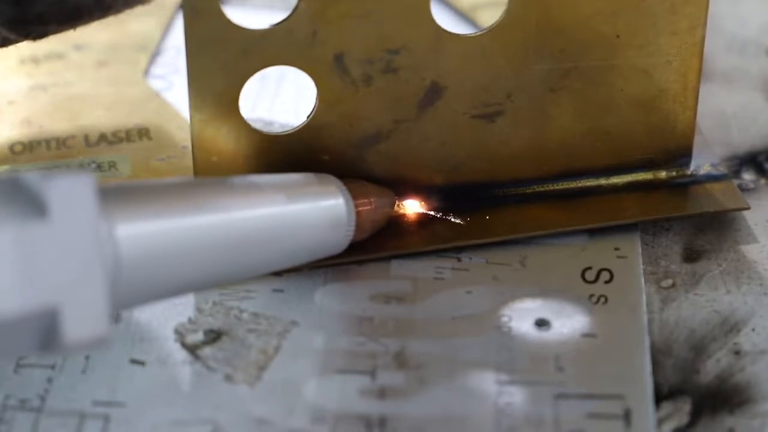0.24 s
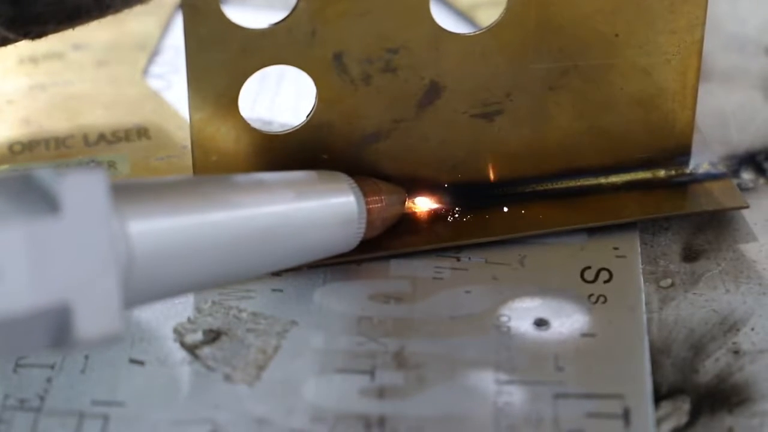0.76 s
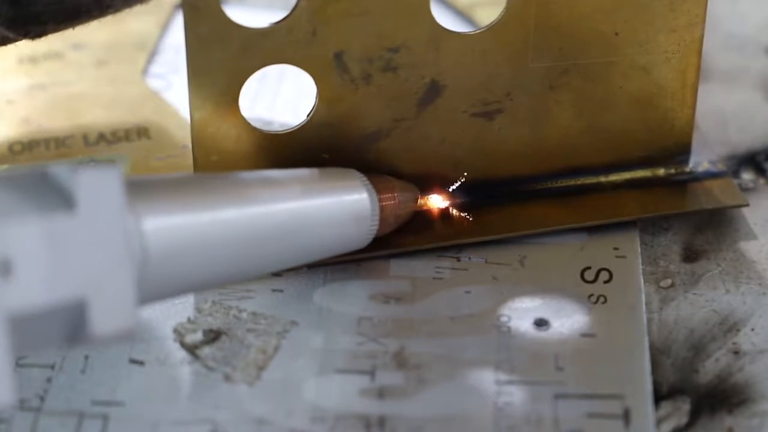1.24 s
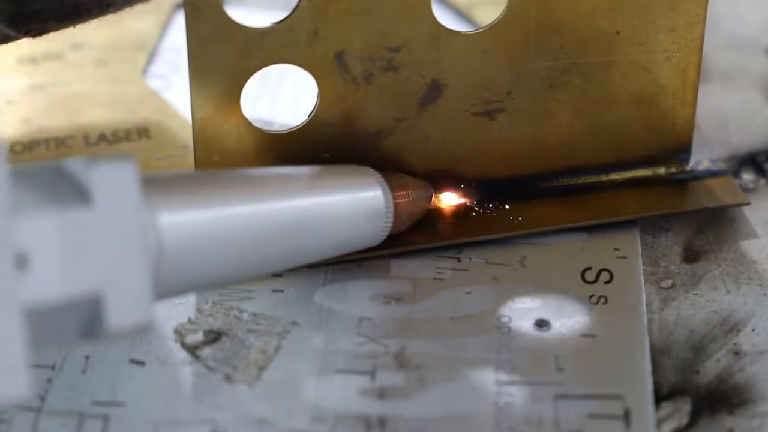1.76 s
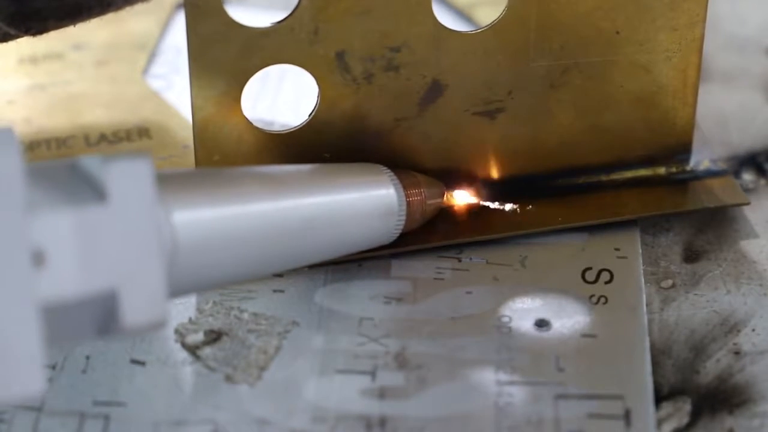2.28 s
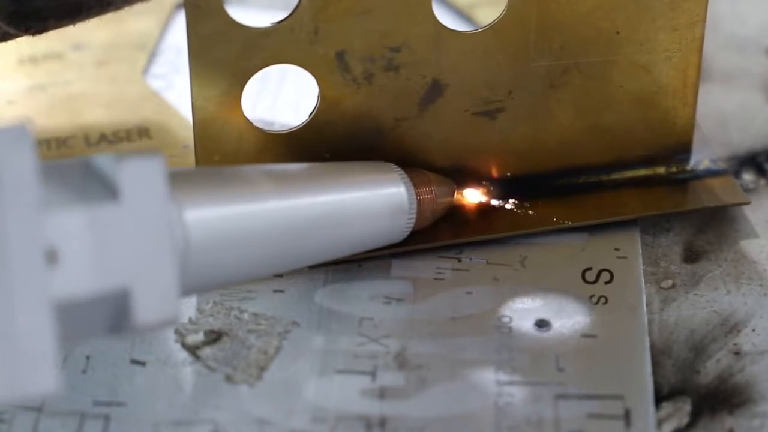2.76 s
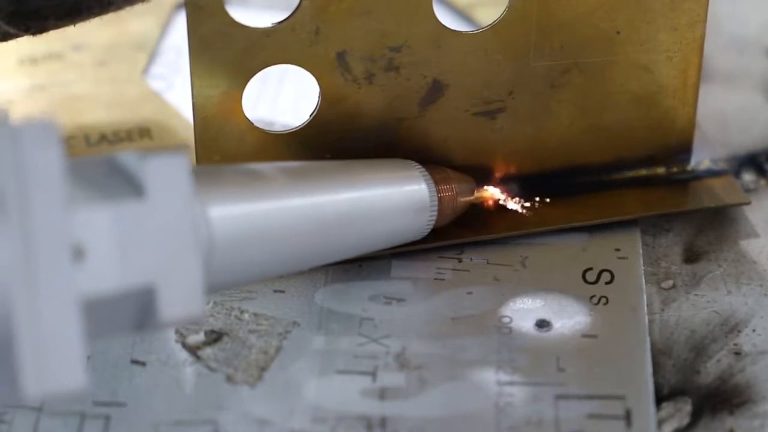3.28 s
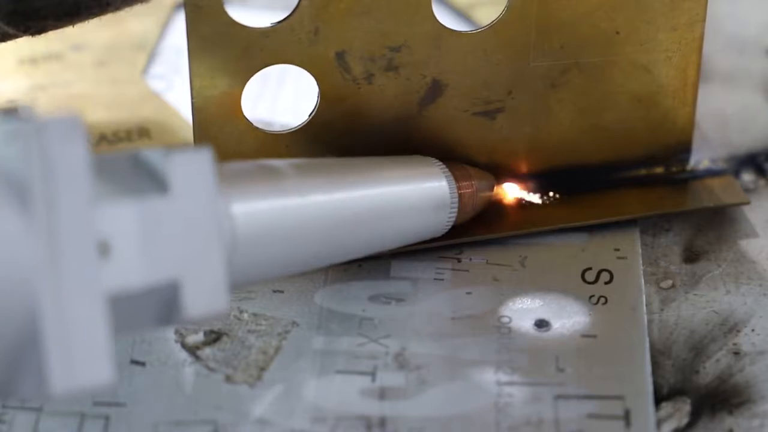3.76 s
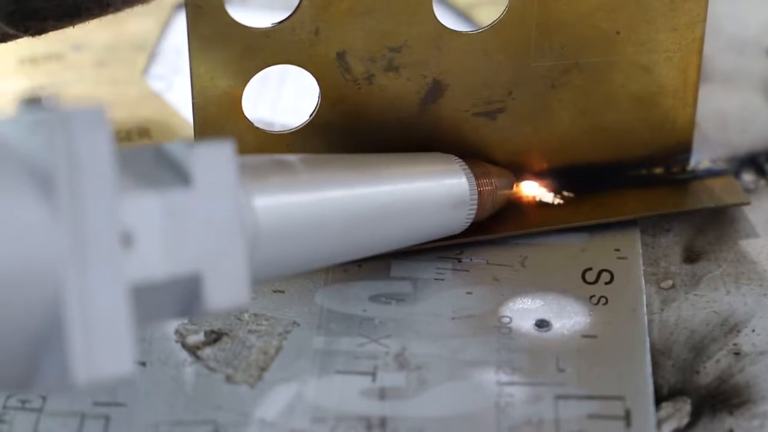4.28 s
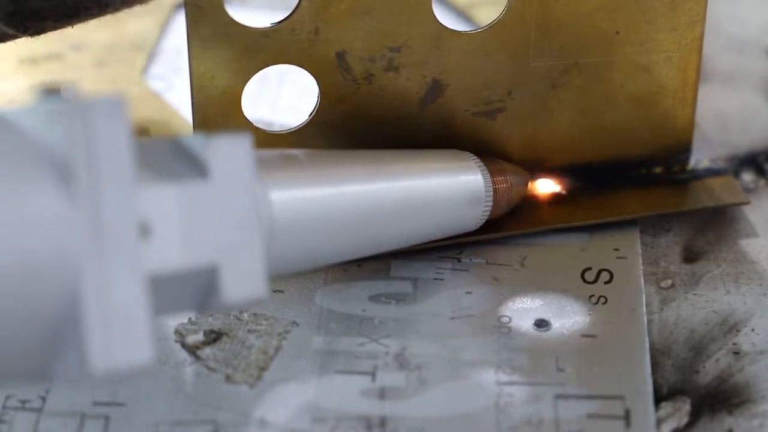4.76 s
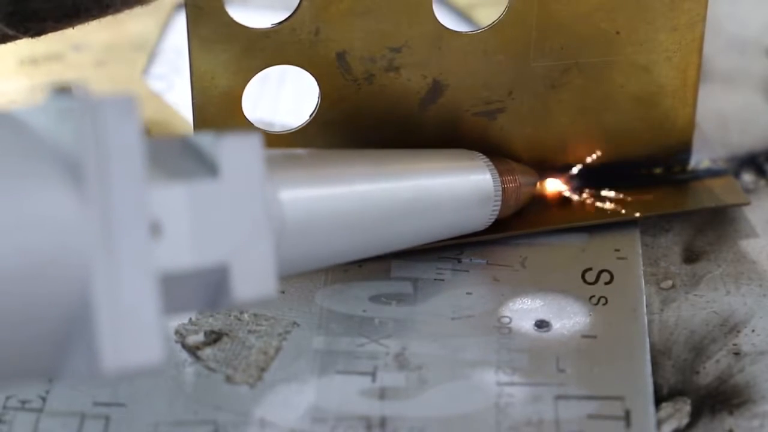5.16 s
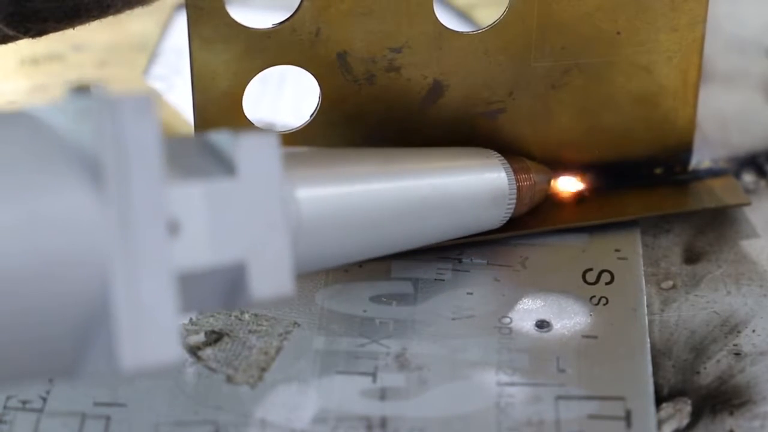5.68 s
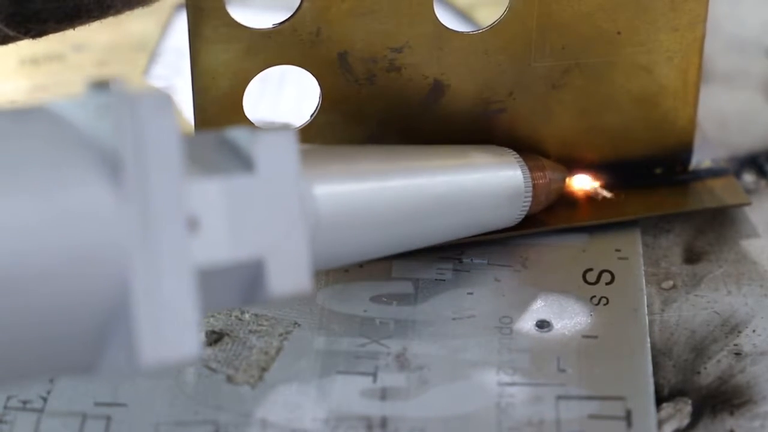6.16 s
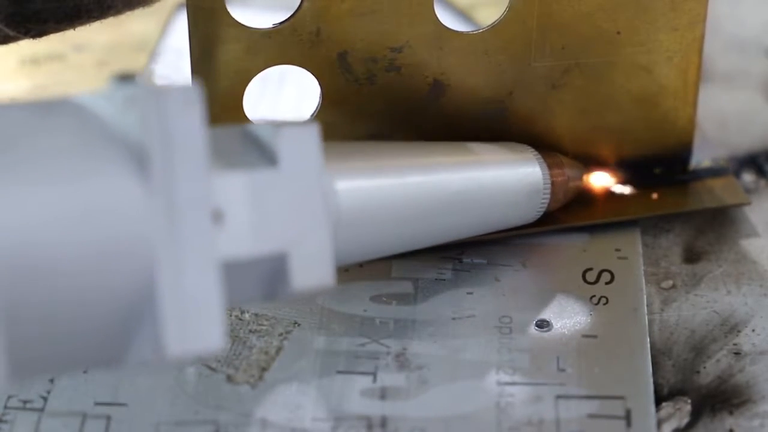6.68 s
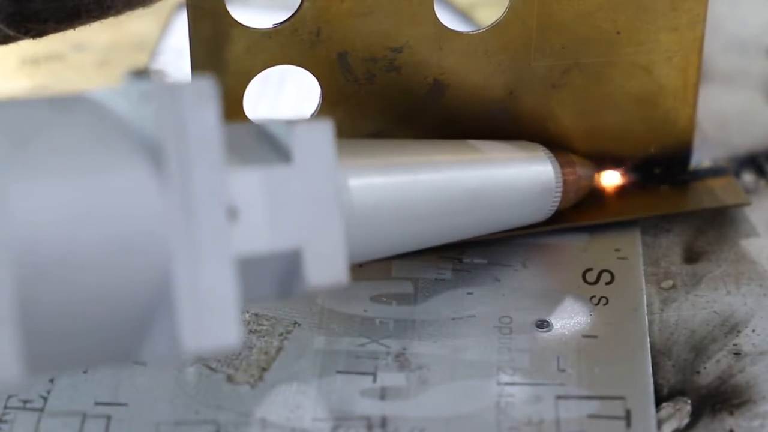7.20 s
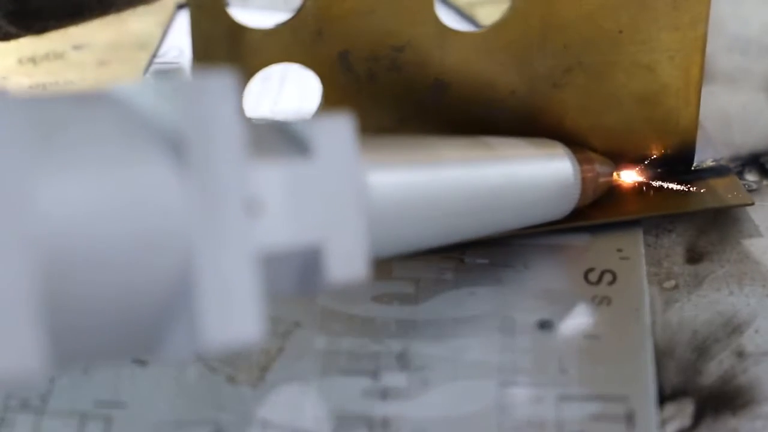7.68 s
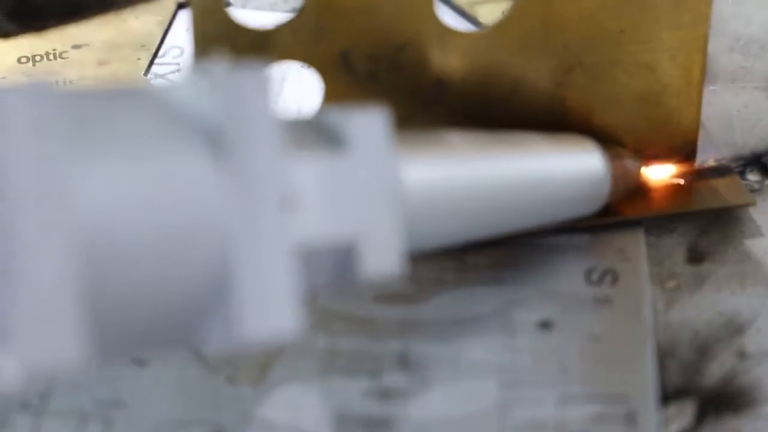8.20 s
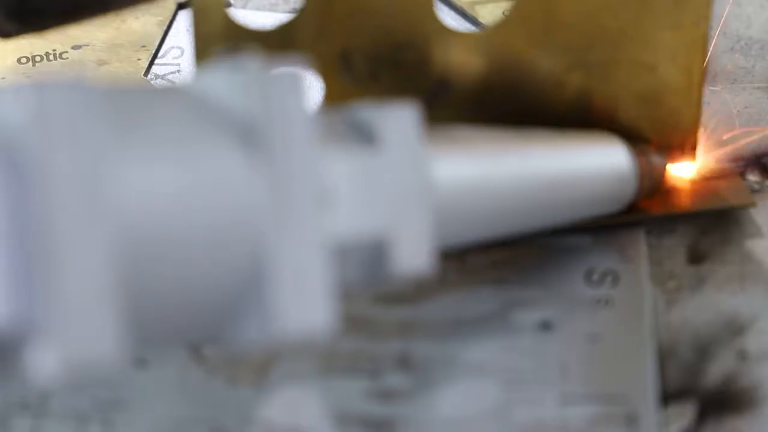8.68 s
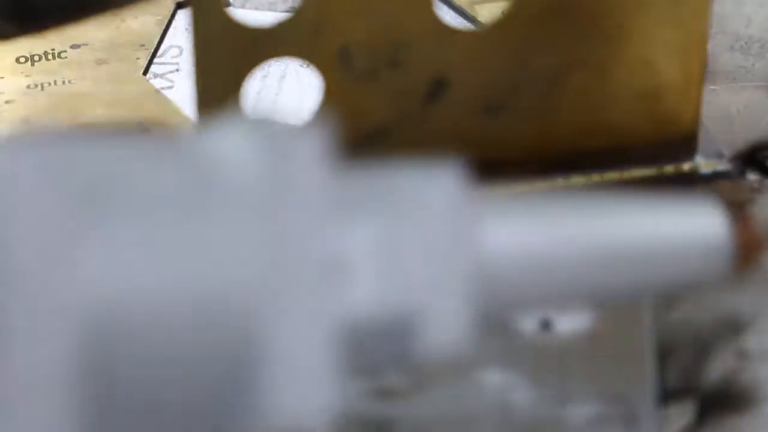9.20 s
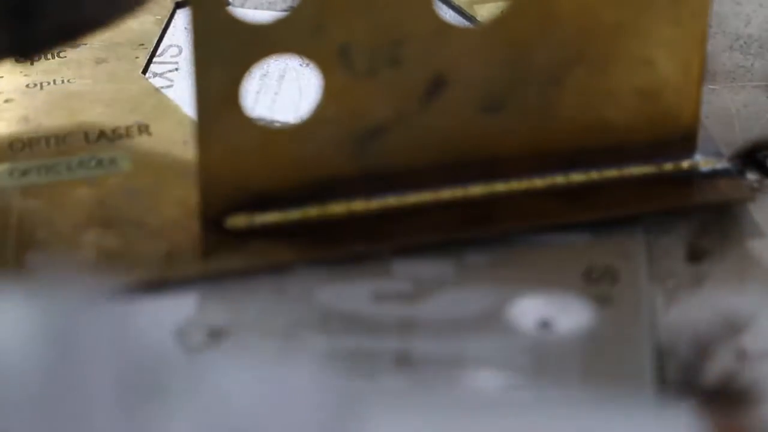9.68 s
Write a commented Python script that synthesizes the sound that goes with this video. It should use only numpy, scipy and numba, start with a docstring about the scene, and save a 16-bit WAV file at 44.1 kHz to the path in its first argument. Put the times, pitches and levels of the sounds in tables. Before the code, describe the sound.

High whistling gas and spitting, sizzling metal from a close laser welding gun end in rapid snaps, leaving workshop fans humming.

```python
"""In a workshop humming with fans, a handheld laser welder runs left to right along a corner seam, close
to a phone. Shielding gas whistles in the nozzle tube while the melt pool sizzles in step with the
sweeping beam. The pool flares at the edge of the sheet, then the beam stutters off in a run of snaps.
Gas blows a moment longer as the gun swings aside. Last, the phone draws back, air stirs past it
and its gain control lifts the hum."""
import sys
import numpy as np
from scipy import signal
from scipy.fft import rfft, irfft, next_fast_len
from scipy.io import wavfile
from scipy.ndimage import uniform_filter1d, minimum_filter1d
from numba import njit

SR = 44100
rng = np.random.default_rng(int(sys.argv[2]) if len(sys.argv) > 2 else 0)


def dump_mix(stems):
    """Bounce the given channels to the path in sys.argv[1] as a 16-bit WAV at rate SR."""
    frames = np.atleast_2d(stems).T  # one column per channel
    limited = np.clip(frames, -1, 1)  # hard clip at full scale
    pcm = np.round(limited * 32767).astype(np.int16)
    wavfile.write(sys.argv[1], SR, pcm)


N = 438333
FFT_SIZE = next_fast_len(N, True)
TIME, BIN_HZ = np.arange(N) / SR, np.fft.rfftfreq(FFT_SIZE, 1 / SR)
SEAM_S, BEAM_OFF_S = 9.8, 9.25  # time to cross a full seam length; the beam cuts out

# how alike the phone's two mic ports hear the room: (frequency [Hz], likeness [0-1])
ROOM_LIKENESS = [(60, 1), (300, 0.96), (700, 0.77), (1400, 0.35), (5000, 0)]
# how alike they hear the gun: (frequency [Hz], likeness [0-1])
GUN_LIKENESS = [(800, 0.73), (2500, 0.94), (7500, 0.95), (9000, 0.54), (11000, 1), (14000, 0.24)]


def undb(db):
    """Decibels to gain."""
    return np.exp(np.asarray(db) * (np.log(10) / 20))


def unit(x):
    """Scale to rms 1."""
    return x / np.sqrt(np.mean(x ** 2))


def curves(table):
    """One automation curve for each value column of a timed table."""
    times, *columns = np.transpose(table)
    return [np.interp(TIME, times, column) for column in columns]


def step(at_s, rise_s):
    """A smooth fade from 0 to 1 centred on at_s."""
    return .5 + .5 * np.tanh(2 * (TIME - at_s) / rise_s)


def walk(rate_hz):
    """Random levels held for 1 / rate_hz and slewed twice; spread near 1."""
    hold = int(SR / rate_hz)
    levels = np.repeat(rng.standard_normal(N // hold + 1), hold)
    return 1.16 * uniform_filter1d(uniform_filter1d(levels, hold), hold)[:N]


def over_hz(points):
    """Spread (frequency [Hz], value) points over every bin."""
    hz, value = np.transpose(points)
    return np.interp(np.log(BIN_HZ + 1), np.log(hz), value)


def colour(x, gain):
    """Equalise with one gain per bin."""
    return irfft(rfft(x, FFT_SIZE) * gain, FFT_SIZE)[..., :N]


def ports(mid, side, likeness):
    """Left and right from two unrelated sounds of one colour."""
    alike = np.clip(over_hz(likeness), 0, 1)
    mid, side = colour(mid, np.sqrt((1 + alike) / 2)), colour(side, np.sqrt((1 - alike) / 2))
    return np.array([mid + side, mid - side])


def ring(x, hz, width):
    """One resonance, gain 1 at the centre."""
    return signal.lfilter(*signal.iirpeak(hz, hz / width, SR), x)


@njit
def glide(x, hz, width):
    """Stereo state-variable band-pass with a moving centre, gain 1 there."""
    y, band, low = np.empty(x.shape), np.zeros(2), np.zeros(2)
    for i in range(len(hz)):
        g, damping = np.tan(np.pi * hz[i] / SR), width[i] / hz[i]
        for c in range(2):
            v = (band[c] + g * (x[c, i] - low[c])) / (1 + g * (g + damping))
            band[c], low[c] = 2 * v - band[c], low[c] + 2 * g * v
            y[c, i] = damping * v
    return y


@njit
def delay(x, late):
    """Read x a moving number of samples late, through a windowed sinc."""
    y = np.zeros(len(x))
    for i in range(12, len(x) - 12):
        at = i - late[i] + 1e-6
        j = int(at)
        sine = np.sin(np.pi * (at - j)) / np.pi
        for k in range(-7, 9):
            d = at - j - k
            y[i] += x[j + k] * (1 - 2 * (k & 1)) * sine / d * (1 - (d / 9) ** 2) ** 2
    return y


def workshop():
    """A bed of machine rumble and narrow fan bands; the phone hears more of it as it draws back."""
    # broad rumble: (frequency [Hz], density [dB])
    rumble = [(25, -51), (45, -26), (70, -12), (110, -14.5), (200, -10.5), (380, -11.5), (500, -16.5),
              (650, -16), (720, -21), (1350, -25.5), (2000, -29), (5000, -35), (9000, -45.5), (15000, -58)]
    # fan bands: (centre [Hz], width [Hz], density [dB])
    fan_bands = [(70, 20, -14.5), (134.6, 23, -8), (165.9, 22.3, 1.1), (238, 11.5, -10.5), (308.3, 28, -1),
                 (632, 31, -16), (1160, 14, -17), (1450, 410, -22.5)]
    # the room leans left: (frequency [Hz], left minus right [dB])
    balance = [(60, 1.5), (250, 2.5), (700, 2.5), (1300, .3)]
    fan_power = sum(undb(2 * db) / (1 + (2 * (BIN_HZ - hz) / width) ** 2) ** 2
                    for hz, width, db in fan_bands)
    lean = undb(over_hz(balance) / 2)
    spectrum = np.sqrt(undb(2 * over_hz(rumble)) + fan_power) * np.array([lean, 1 / lean])
    hum = colour(ports(*rng.standard_normal((2, N)), ROOM_LIKENESS), spectrum)
    return unit(hum) * undb(-26.5 + 4 * step(at_s=9.55, rise_s=.35))


def gust():
    """A lumpy low rumble as the phone moves through the air."""
    air = ports(*rng.standard_normal((2, N)), ROOM_LIKENESS)
    for _ in range(2):
        air = ring(air, hz=240, width=260)
    return unit(air) * undb(-25 + 2 * walk(rate_hz=110)) * step(at_s=9.66, rise_s=.08)


def beam_snaps():
    """Each snap is a sharp push then a pull; a rough drag rings the sheet edge between them."""
    # the beam switching on and off at the edge: (time [s], level [dB])
    snaps = [(9.2175, -7), (9.2425, -3.5), (9.255, -8.5), (9.2675, -8.5), (9.28, -9), (9.2925, -11),
             (9.2991, -13)]
    # sheet resonances: (centre [Hz], width [Hz], level [dB])
    sheet_modes = [(860, 340, 2), (2270, 900, -5), (4200, 2800, -14)]
    pull_after_s, sharpness_hz = .00062, 2800
    shocks = np.zeros(N)
    for at_s, db in snaps:
        shocks[int(at_s * SR)] = undb(db)
        shocks[int((at_s + pull_after_s) * SR)] = -undb(db)
    pole = np.exp(-2 * np.pi * sharpness_hz / SR)
    cracks = signal.lfilter([1], [1, -2 * pole, pole ** 2], shocks)
    cracks *= np.max(shocks) / np.max(np.abs(cracks))
    grit = rng.standard_normal(N) * undb(2.9 * rng.exponential(1, N))
    rasp = unit(sum(undb(db) * hz / width * ring(grit, hz, width) for hz, width, db in sheet_modes))
    dragging = step(snaps[0][0], .01) - step(snaps[-1][0], .01)
    return cracks + undb(-29) * dragging * rasp


def pool_surges():
    """The pool surges or falters in brief bell-shaped swells and dips, in dB."""
    # swells (+) and dips (-): (time [s], change [dB], length [s])
    surges = [(0.123, -2, 0.034), (.36, -7, 0.051), (.49, 4.5, 0.094), (.76, -7, 0.11), (1.16, 4.5, 0.11),
              (1.843, 4.5, 0.041), (2.912, 3.5, 0.069), (3.136, 5.5, 0.12), (3.224, 0.5, .04),
              (3.356, -6, 0.043), (3.556, 4, 0.04), (3.692, 3.5, 0.083), (4.05, 4.5, 0.21),
              (4.424, 5, 0.049), (4.9, 6, 0.069), (5.505, -4, 0.16), (5.762, 5.5, 0.05), (6.203, 3, 0.072),
              (6.65, -4, 0.066), (7.248, -2.5, 0.17), (7.5, 1.5, 0.086), (7.64, -10, .04)]
    change_db = np.zeros(N)
    for at_s, db, length_s in surges:
        width_s = length_s * np.where(TIME < at_s, .94, 1)  # slightly quicker in than out
        change_db += db * np.exp(-((TIME - at_s) / width_s) ** 2)
    return change_db


def melt_pool():
    """Boiling metal spurts under a steadier fizz, throbs with each beam sweep and flares at the edge."""
    # tone of the sizzle: (frequency [Hz], density [dB])
    sizzle_tone = [(500, -22), (1000, -12.5), (2000, -7.5), (2250, 3), (2600, 0.5), (3300, 0), (4350, 3),
                   (4720, 0.5), (5050, 3.5), (6100, 3.5), (6600, -8.5), (7350, 2), (7700, 3), (8300, -7.5),
                   (10000, -18)]
    # mean sizzle along the seam: (time [s], level [dB])
    sizzle_level = [(0, -27), (2.5, -26.5), (4.5, -26.5), (6.3, -25), (8.5, -23.5)]
    # tone of the high fizz: (frequency [Hz], density [dB])
    fizz_tone = [(7500, -35), (8250, -10), (8570, 0), (9000, -3), (9600, -10), (10300, 1), (10900, 2),
                 (11400, -4), (12600, 3), (13100, 1), (13500, -12), (14100, -2), (14500, -3), (15000, -13),
                 (15700, -16)]
    sweep_hz, edge_s, fade_s = 37.7, 8.57, .06
    at_edge = step(edge_s, rise_s=.04)
    sweep = 2 * np.pi * np.cumsum(sweep_hz * (1 + .033 * walk(5.4))) / SR
    depth = np.clip(.26 - .021 * TIME, 0, 1)
    throb = 1 + depth * (np.cos(sweep) + .18 * np.cos(2 * sweep))
    spit = undb(1.26 * walk(40) + 2.2 * rng.exponential(1, N))
    boil = ports(*(rng.standard_normal((2, N)) * spit * throb), GUN_LIKENESS)

    sizzle_db = curves(sizzle_level)[0] + pool_surges() + .5 * at_edge + .74 * walk(18)
    sizzle = undb(sizzle_db) * unit(colour(boil, undb(over_hz(sizzle_tone))))
    hollow = .45 * step(at_s=7.6, rise_s=1.2)  # a notch opens near the end of the seam
    sizzle -= hollow * ring(sizzle, hz=4860, width=670)

    fizz = unit(colour(boil, undb(over_hz(fizz_tone))))
    top = colour(fizz, BIN_HZ > 11400)
    fizz = undb(1.3 * walk(8.6)) * (fizz - top) + undb(walk(21)) * top  # two bands flicker apart
    fizz *= undb(-33 - .41 * TIME + 3.5 * at_edge)

    flare_db = -51 + at_edge * (16 - 3 * (TIME - edge_s))
    flare = undb(flare_db) * unit(ring(ring(boil, hz=670, width=1900), hz=1550, width=2700))
    treble = signal.sosfilt(signal.butter(4, 8800, 'high', fs=SR, output='sos'), boil)
    flare_top = undb(-47) * at_edge * unit(treble)
    beam = np.exp(-np.maximum(TIME - BEAM_OFF_S, 0) / fade_s)
    return beam * (sizzle + fizz + flare + flare_top)


def gas_whistle(travel):
    """Turbulent gas blows the tube's odd modes; warmer gas raises them, and each beams its own way."""
    # modes of the nozzle tube, a pipe shut at one end: (frequency [Hz])
    mode_hz = [2325, 3940, 5507, 7065, 8620, 10450, 12050, 14150, 15150]
    # their voicing: (width [Hz], level [dB], left minus right at seam start [dB], at seam end [dB])
    voicing = [(235, -12, -1, -0.5), (126, -2.5, 1.5, 0), (157, 0.3, -1.3, -1), (191, -5, 2, -4),
               (220, -14.5, 14, 6), (600, -8.5, 2, 0), (500, -13, 9, 5.5), (800, -11.5, 5, 1),
               (900, -42, 1.5, -5)]
    # pitch rise of modes 1, 2, 3 and 4 upward: (along the seam [%], extra once off the sheet [%])
    pitch_rise = [(.3, .3), (1.3, .1), (.4, 1.2), (.1, .6)]
    # bandwidth once off the sheet: (modes 1-4 [factor], upper modes [factor])
    lifted_width = [.7, 1.4]
    # beaming at the phone as the gun turns: (time [s], modes 1, 2, 3, 4, 5-6, 7-9 [dB each])
    poses = [(0, 2, 2, 0.5, 1, -5, -6), (4.5, 0.5, 2, 0.5, -2, -10, -9.5), (8.3, -3, -1, 2, 2, -12.5, -11),
             (9.15, -21, -4.5, -1.5, -3.5, -27, -26), (9.31, 6, 5.5, 3, -3, -12, -14),
             (9.37, 9.5, 3, -4, -4, -5, -1), (9.43, 4, -5, 4, -2, -12, -2), (9.49, 6, 11, 7, -1, 6.5, 6),
             (9.54, 10, 11.5, 0, 6, 3, 3.5), (9.61, 9, 14, 12, 14.5, 4, 4), (9.66, 10, 4, 6, 0, 4, 3),
             (9.74, 7, 7, -3, 3, 0, -3)]
    # the beaming curve each mode follows: (curve [index])
    pose_of_mode = [0, 1, 2, 3, 4, 4, 5, 5, 5]
    # gas flow as it reaches the phone: (time [s], level [dB])
    flow_level = [(0, -20.5), (3, -19.5), (7.5, -19.5), (8.1, -21), (8.6, -21), (9.2, -20.5), (9.3, -27.5),
                  (9.42, -21), (9.5, -31), (9.58, -32.5), (9.65, -32.5), (9.69, -36.5), (9.74, -43),
                  (9.94, -71)]
    beaming_db = curves(poses)
    turbulence = ports(*rng.standard_normal((2, N)), GUN_LIKENESS)
    along, lifted = TIME / SEAM_S, step(BEAM_OFF_S, rise_s=.2)
    waver = 1 + .004 * walk(9)
    whistle = np.zeros((2, N))
    for k, (hz, (width, db, start_db, end_db)) in enumerate(zip(mode_hz, voicing)):
        seam_rise, lift_rise = pitch_rise[min(k, 3)]
        pitch = waver * (1 + (seam_rise * along + lift_rise * lifted) / 100)
        spread = 1 + (lifted_width[k > 3] - 1) * lifted
        gain = (-1) ** k * undb(db + beaming_db[pose_of_mode[k]] + 1.1 * walk(25))
        lean = undb((start_db + (end_db - start_db) * travel) / 2)
        whistle += gain * glide(turbulence, hz * pitch, width * spread) * np.array([lean, 1 / lean])
    return unit(whistle) * undb(curves(flow_level)[0])


def gain_control(x):
    """Rides the average level, ducks at once for a peak, holds, then opens up; a little deaf to bass."""
    target_db, squeeze, max_gain_db = -18, .46, 6  # squeeze: share of the gap that is closed
    average_ms, hold_ms, release_ms, look_ahead_ms = 48, 66, 42, 4
    crest_db = 12.5  # how far a peak may stand over the average
    mid = x.mean(axis=0)
    sidechain = mid - (1 - undb(-26)) * signal.lfilter(*signal.butter(1, 700, fs=SR), mid)
    block = SR // 1000
    blocks = sidechain[:N // block * block].reshape(-1, block)
    trailing = lambda ms: dict(size=ms | 1, origin=ms // 2)
    mean_db = 10 * np.log10(uniform_filter1d(np.mean(blocks ** 2, axis=1), **trailing(average_ms)))
    peak_db = 20 * np.log10(-minimum_filter1d(-np.abs(blocks).max(axis=1), **trailing(hold_ms)))
    want_db = np.minimum(squeeze * (target_db - np.maximum(mean_db, peak_db - crest_db)), max_gain_db)
    gain_db, release = want_db.copy(), np.exp(-1 / release_ms)
    for i in range(1, len(gain_db)):
        gain_db[i] = min(want_db[i], want_db[i] + release * (gain_db[i - 1] - want_db[i]))
    gain_db = uniform_filter1d(gain_db, size=look_ahead_ms + 1)
    return x * undb(np.interp(np.arange(N) / block + look_ahead_ms, np.arange(len(gain_db)), gain_db))


def scene():
    """The moving gun reaches two close mic ports directly and off the sheets, over the hum."""
    # reflections off the sheets, left port then right port: (delay [ms], gain [factor])
    echoes = [
        [(.26, 0.088), (.62, 0.021)],
        [(.26, 0.12), (.47, 0.14)],
    ]
    lag_ms, swing_db = .036, 2  # left port's lag per seam length; left minus right at full swing
    swing = np.exp(-((TIME - 9.55) / .26) ** 2)  # the gun swings aside and back
    travel = np.minimum(TIME, BEAM_OFF_S) / SEAM_S + .8 * swing  # in seam lengths
    gun = gas_whistle(travel) + melt_pool() + beam_snaps()
    left, right = [direct + sum(gain * np.roll(direct, int(ms * SR / 1000)) for ms, gain in taps)
                   for direct, taps in zip(gun, echoes)]
    left = delay(left, travel * lag_ms * SR / 1000)
    pan = undb(np.array([swing, -swing]) * swing_db / 2)
    return workshop() + gust() + np.array([left, right]) * pan


def record(dry):
    """The phone rides its gain, rounds the loudest peaks and cuts the top."""
    soft = np.tanh(1.135 * gain_control(dry)) / 1.06
    return signal.sosfilt(signal.ellip(12, .3, 60, 15710, fs=SR, output="sos"), soft)


dry = scene()
out = record(dry)
dump_mix(out)
```